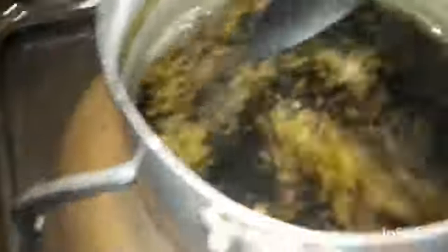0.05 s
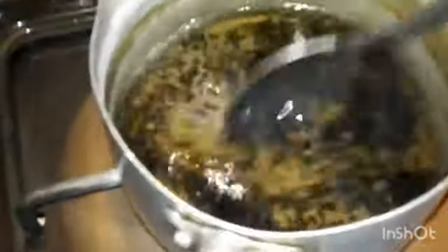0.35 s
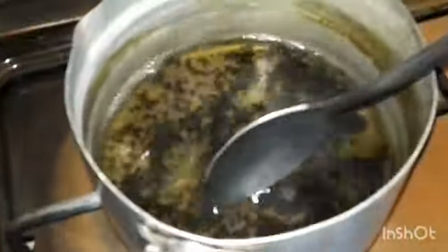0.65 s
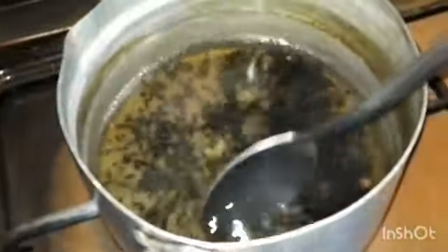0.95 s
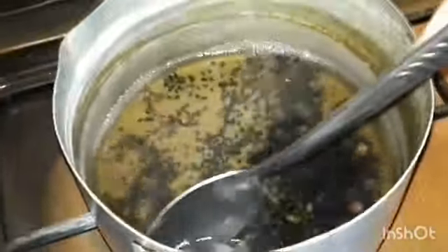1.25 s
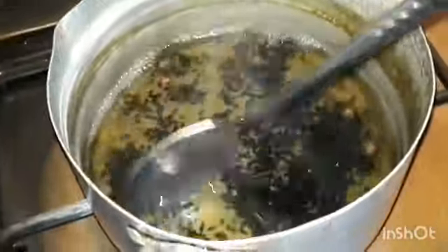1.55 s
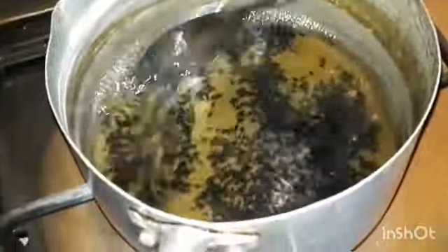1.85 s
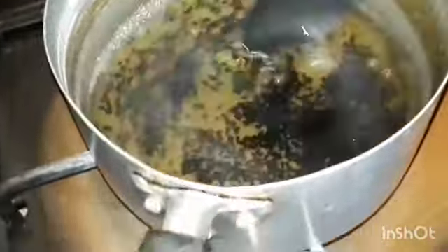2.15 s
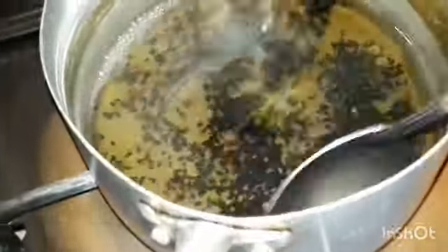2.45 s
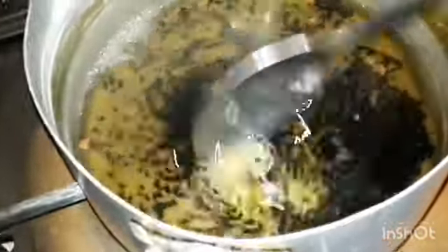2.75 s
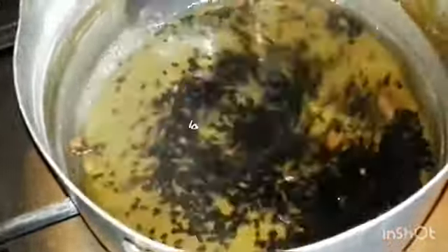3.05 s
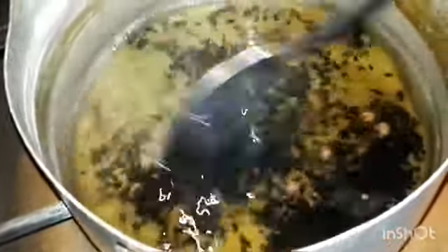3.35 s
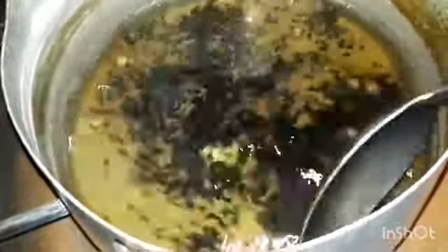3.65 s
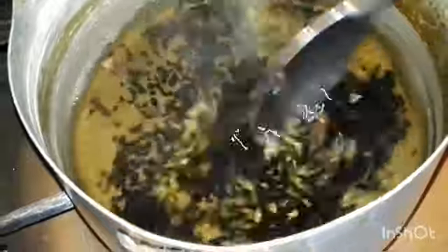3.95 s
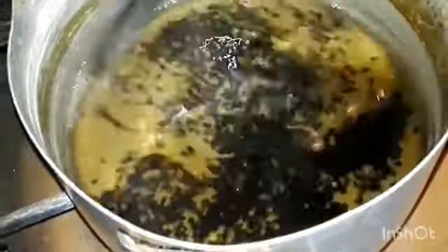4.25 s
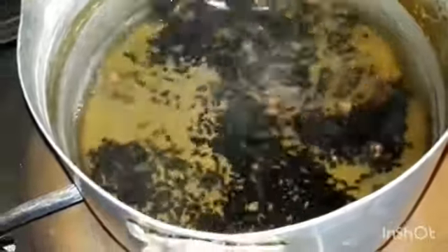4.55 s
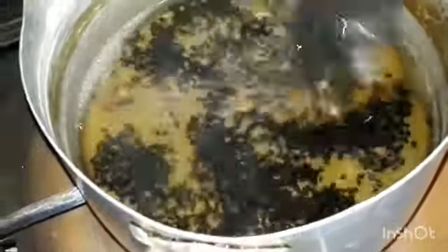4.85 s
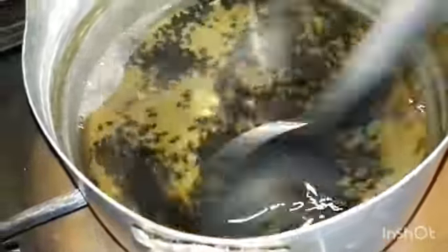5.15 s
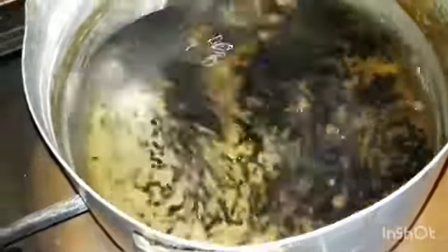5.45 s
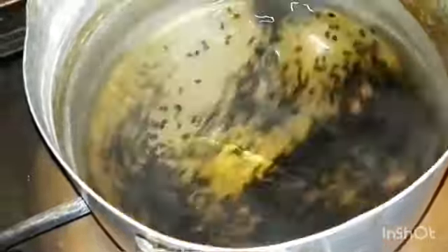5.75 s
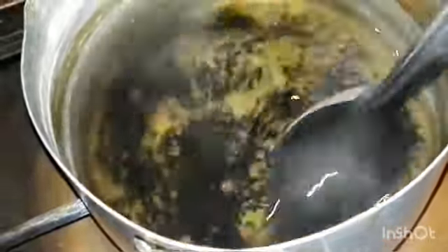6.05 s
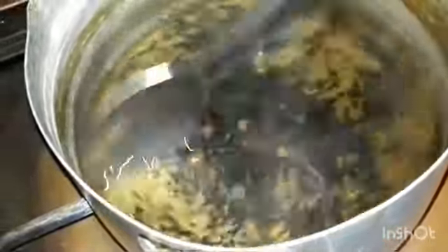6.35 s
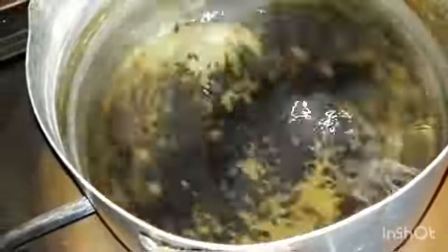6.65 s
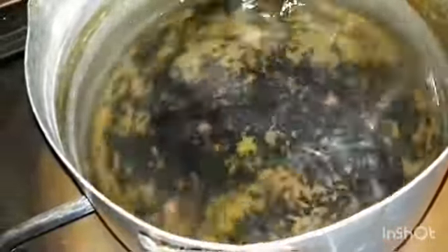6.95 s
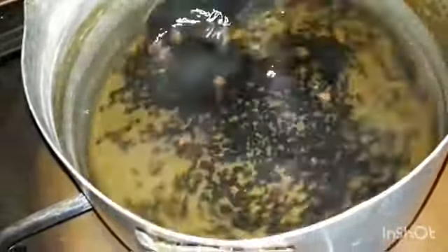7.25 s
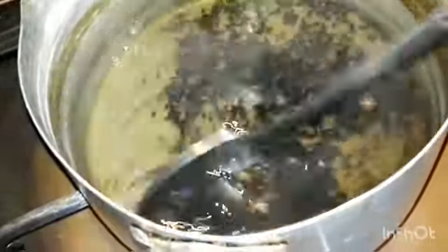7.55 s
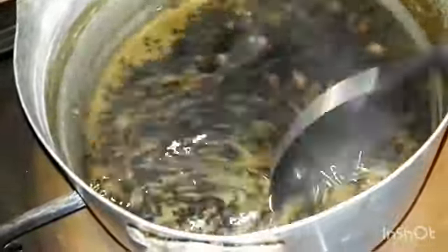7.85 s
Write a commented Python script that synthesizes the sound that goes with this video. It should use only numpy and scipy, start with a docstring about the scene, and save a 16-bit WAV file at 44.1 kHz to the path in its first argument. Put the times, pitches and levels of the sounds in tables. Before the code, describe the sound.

A metal ladle stirs tea simmering in an aluminium pot on a stove. It knocks, skids and scrapes unevenly, each blow giving a brief ring and a low boom in the small, hard kitchen. The liquid gurgles, glugs and sizzles in spurts up the hot wall. Near the end the pot rocks with a low wobble. The phone microphone is close, with some handling rumble.

```python
"""A metal ladle stirs a simmering aluminium pot of tea on a stove in a small, hard kitchen.
It knocks, skids and scrapes; the pot rings briefly and rocks near the end, and low room resonances
swell after each blow and boom on. The tea gurgles, glugs and sizzles up the hot wall.
Close pickup on a hand-held phone's two microphones, a hand's length away, with some handling rumble."""
import sys
import numpy as np
from scipy import signal
from scipy.fft import rfft, irfft
from scipy.io import wavfile
from scipy.ndimage import uniform_filter1d

SR = 44100
rng = np.random.default_rng(int(sys.argv[2]) if len(sys.argv) > 2 else 0)


def unload_wav(signal):
    """Save mono or channel-first audio to the path in sys.argv[1] as 16-bit WAV at rate SR, clipped to [-1, 1]."""
    wavfile.write(
        sys.argv[1],
        SR,
        np.round(np.clip(np.atleast_2d(signal).T, -1, 1) * 32767).astype(np.int16),
    )


N = 357651
T = np.arange(N) / SR
RING_T = T[:32768]

# the ladle drags along the pot: start/s, length/s, force/dB,
# then relative to the force: grit/dB, low boom/dB, singing wall/dB, gurgle/dB; last, singing f/Hz
STROKES = [(0.163, .16, -50, -3, 3, -3, -1, 925), (1.048, .17, -66, -19, 5.5, -0.5, 0, 936),
           (2.0, .12, -49.5, -6, -3, -4.5, 0, 962), (2.572, .1, -46, -27.5, 2, -0.5, -8, 935),
           (3.202, .12, -45.5, -12.5, -5.5, 0.5, -6, 972), (3.874, 0.097, -56.5, 5, 0, -2, 0, 940),
           (4.38, 0.21, -51.5, -15, -8.5, 0.5, -2, 970), (4.601, 0.21, -56, -3.5, 6, -14, 3, 900),
           (4.826, 0.13, -47, -2, -2, -2.5, 0, 940), (5.091, .16, -53, -13.5, -14, -11, 2.5, 844),
           (5.29, .09, -43, -1, -5.5, -6, 1, 789), (5.46, .12, -47, -19, -21, 4.5, -2, 970),
           (5.615, .2, -45.5, -21, -3.5, -10, 0, 920), (5.83, .17, -46, -6, -1.5, 3, -3.5, 949),
           (6.035, 0.18, -55.5, -21, -0.5, -7.5, 1, 950), (6.23, 0.18, -51, -3, -1, -9, 3, 874),
           (6.403, .09, -55, -10, -12, 4, -1, 950), (6.606, 0.06, -53, -23, -1, -9, 0, 1000),
           (6.871, 0.13, -67, -22.5, 4, -15, -3, 950), (7.275, 0.1, -51, -3, 2.5, -10, 3, 880),
           (7.421, 0.1, -47, -10, -28, -2, -3.5, 946), (7.785, .09, -46, -3.5, 1, 3, 2, 934),
           (7.899, .21, -48.5, -2.5, 3, -2, 1, 976)]
# spectrum of the pot's dense shell modes: f/Hz, level/dB
SHELL_SPECTRUM = [(100, -30), (400, -5), (900, 2), (1400, 1), (2000, 2), (2700, -3), (4000, 0), (5600, 1),
                  (7200, -2), (10000, -3), (14000, -2)]


def undb(db):
    """Decibels to gain."""
    return np.exp(np.asarray(db) * np.log(10) / 20)


def unit(x):
    """Scale to rms 1."""
    return x / np.sqrt(np.mean(x ** 2))


def unit_energy(x):
    """Scale a response to energy 1."""
    return x / np.sqrt(np.sum(x ** 2))


def add(out, s, x):
    """Mix x into out from time s."""
    i = max(int(s * SR), 0)
    out[i:i + len(x)] += x[:N - i]


def delayed(x, s):
    """The same sound, s seconds later."""
    return np.r_[np.zeros(int(s * SR)), x][:N]


def convolve(x, response):
    """Play x through a response."""
    return signal.oaconvolve(x, response)[:len(x)]


def colour(x, points, size=2048):
    """Minimum-phase filter through points of f/Hz, level/dB."""
    hz, db = np.transpose(points)
    bin_hz = np.arange(size // 2 + 1) * SR / size
    gain = undb(np.interp(np.log(bin_hz + 1), np.log(hz), db))
    cepstrum = irfft(np.log(gain))
    cepstrum[1:size // 2] *= 2
    cepstrum[size // 2 + 1:] = 0
    return convolve(x, irfft(np.exp(rfft(cepstrum))))


def band(x, lo_hz, hi_hz):
    """Band-pass."""
    return signal.sosfilt(signal.butter(2, [lo_hz, hi_hz], "band", fs=SR, output="sos"), x)


def resonance(x, hz, width_hz):
    """A two-pole resonance whose centre may move; noise comes out equally strong at any width."""
    turn = np.exp(2j * np.pi * np.cumsum(hz) / SR)
    pole = np.exp(-np.pi * width_hz / SR)
    baseband = signal.lfilter([(1 - pole) ** 2], [1, -2 * pole, pole * pole], x * turn.conj())
    return 2 * (turn * baseband).real * np.sqrt(2 * SR / (np.pi * width_hz))


def walk(rate_hz):
    """Smooth random wandering, rms 1."""
    hold = int(SR / rate_hz)
    steps = np.repeat(rng.standard_normal(N // hold + 1), hold)
    return unit(uniform_filter1d(steps, hold)[:N])


def clicks(per_s, spread_db):
    """Random clicks of uneven size, rms 1."""
    size = undb(spread_db * np.minimum(rng.exponential(size=N), 4))
    return unit((rng.random(N) < per_s / SR) * size * rng.choice([-1, 1], N))


def held(start, length, attack_s, release_s):
    """Gain over time: a straight attack, a hold, an exponential release."""
    attack = np.clip((T - start) / attack_s, 0, 1)
    return attack * np.exp(-np.clip((T - start - length) / release_s, 0, 20))


def fade(t60):
    """Exponential decay, 60 dB in t60 seconds."""
    return np.exp(-np.log(1000) * RING_T / t60)


def modes(table, size=len(RING_T), tuning=1):
    """One decaying sine for each row of f/Hz, level/dB, t60/s; neighbours swing in opposite sense."""
    return np.array([(-1) ** k * undb(db) * np.sin(2 * np.pi * hz * tuning * RING_T[:size])
                     * fade(t60)[:size] for k, (hz, db, t60) in enumerate(table)])


def bubbles(force, db, count, cycles, glide, lowest_hz, octaves):
    """Bubbles ring and rise in pitch; they come thicker and louder where the force is high."""
    out = np.zeros(N)
    stirring, loudness = np.cumsum(force), np.sqrt(force / force.mean())
    for when, height, weakness in rng.random((count, 3)):
        hz = lowest_hz * 2 ** (octaves * height)
        age = T[:int(2 * cycles / hz * SR)] * hz / cycles
        plop = np.sin(2 * np.pi * cycles * age * (1 + glide * age / 2)) * np.exp(-3 * age)
        i = np.searchsorted(stirring, when * stirring[-1])
        add(out, i / SR, undb(db - 10 * weakness) * loudness[i] * plop)
    return out


def simmer(murmur_db=-64, blip_db=-66):
    """The burner and the pot murmur on; lone bubbles surface."""
    # spectrum of burner and pot: f/Hz, level/dB
    spectrum = [(15, -49), (25, -46), (87, -31), (113, -2.5), (382, -6.5), (498, -34.5), (539, -12.5),
                (684, -24), (1050, -11.5), (1640, -23), (2080, -22.5), (2440, -32.5), (4500, -29.5),
                (14000, -30)]
    restless = undb(1.3 * walk(9))
    blips = bubbles(np.ones(N), blip_db, count=160, cycles=12, glide=.08, lowest_hz=230, octaves=3)
    murmur = unit(colour(rng.standard_normal(N), spectrum))
    return murmur * undb(murmur_db) * restless + blips


def handling(steady_db=-71.5):
    """Low, uneven rumble through the phone's body, stronger while the hand shifts."""
    # shifts of grip: start/s, length/s, level/dB
    grips = [(0, 1.51, -60), (7.755, 0.23, -55)]
    shifting = sum(undb(db) * held(start, length, attack_s=.0079, release_s=.03)
                   for start, length, db in grips)
    surge = undb(2 * walk(15))
    rumble = unit(band(rng.standard_normal(N), 24, 100))
    return rumble * (undb(steady_db) + shifting) * surge


def sizzle(flutter_db=3, crest_shape=2.6):
    """Countless tiny steam bubbles burst where tea meets hot metal, in spurts of changing colour."""
    # tea swells up the hot wall and falls back: crest t/s, half width/s, level/dB
    washes = [(.01, 0.019, -53), (.67, 0.25, -73.5), (1.059, 0.17, -64.5), (1.55, 0.16, -60),
              (1.831, 0.09, -52), (2.66, 0.13, -57.5), (2.891, 0.064, -47.5), (4.169, 0.14, -69.5),
              (5.35, 0.079, -47), (5.495, 0.068, -36.5)]
    # edges of the bands that spurt independently: f/Hz
    edges = [500, 3000, 4500, 6500, 9500, 16000]
    # spectrum of the bursting bubbles: f/Hz, level/dB
    spectrum = [(500, -13.5), (2000, -0.5), (3000, -1.5), (4200, 2.5), (5700, 7), (7500, 1.5), (10000, 0.5),
                (14000, -3.5)]
    wetted = sum(undb(db) * np.exp(-np.abs((T - crest) / width) ** crest_shape)
                 for crest, width, db in washes)
    hiss = sum(band(clicks(9000, 1.7), lo, hi) * undb(1.7 * walk(30))
               for lo, hi in zip(edges, edges[1:]))
    return unit(colour(hiss, spectrum)) * wetted * undb(flutter_db * walk(39.88))


def spot_weights(count):
    """Random mode gains: each contact favours some modes over others."""
    return undb(2.5 * rng.standard_normal(count))


def pot_response(shell_db, shell_t60, size=4096, contact_s=.0003):
    """Wall, rim and tick responses at one spot: clear modes over a dense, quickly dying shell."""
    # modes of pot and ladle, damped by the tea: f/Hz, level/dB, t60/s
    pot_modes = [(786, -17, 0.043), (819, -5, 0.0089), (981, -1, 0.016), (1027, -2.5, 0.011),
                 (1250, -13.5, 0.029), (1372, -10.5, 0.066), (1860, -2, 0.017), (1887, -4, 0.017),
                 (1870, 17.5, 0.00083), (3650, 18, 0.0019), (3940, -15.5, 0.087), (3860, -24.5, 0.14),
                 (5760, -2, 0.018), (8020, 3, 0.0078), (8400, -35.5, 0.025), (9420, -10, 0.028),
                 (11160, -21, 0.051)]
    tuning = 1 + .012 * rng.standard_normal()
    shell = colour(rng.standard_normal(size) * fade(shell_t60)[:size], SHELL_SPECTRUM)
    clear = spot_weights(len(pot_modes)) @ modes(pot_modes, size, tuning)
    onset = 1 - np.exp(-RING_T[:size] / contact_s)
    ring = (clear + undb(shell_db) * shell) * onset
    wall, rim, tick = band(ring, 680, 1170), band(ring, 1500, 2080), band(ring, 3300, 16000)
    return np.array([unit_energy(wall), unit_energy(rim), unit_energy(tick)])


def diffuse_tick(size=512):
    """Summed over many directions or contact points, the treble modes blur into an even tick."""
    return unit_energy(band(colour(signal.unit_impulse(size), SHELL_SPECTRUM), 2400, 18000))


def skids(wall_db=-3, rim_db=-2, grit_db=-2):
    """Pressed hard, the ladle's edge sticks and slips in a short rough rasp."""
    # the edge chatters over the metal: t/s, length/s, level/dB, rim emphasis/dB
    chatters = [(0.017, 0.072, -58, 1.5), (3.686, 0.045, -34.5, -2), (4.645, 0.04, -45.5, -18),
                (4.72, 0.037, -43, 1), (4.905, 0.078, -40, -5), (6.709, 0.011, -44, -13),
                (7.437, 0.0099, -57.5, 18)]
    out, slips = np.zeros(N), clicks(1200, 2)
    for s, length, db, emphasis in chatters:
        wall, rim, _ = pot_response(shell_db=2, shell_t60=.0064)
        burst = unit(slips[int(s * SR):][:int(length * SR)])
        force = undb(db) * burst * signal.windows.tukey(len(burst))
        add(out, s, signal.fftconvolve(force, undb(wall_db) * wall + undb(rim_db + emphasis) * rim))
        add(out, s, signal.fftconvolve(force, undb(grit_db) * diffuse_tick()))
    return out


def low_boom_response(dense_db, dense_t60=.52, swell_s=.017):
    """Low room resonances swell after a blow and boom on."""
    # low resonances of the room: f/Hz, level/dB, t60/s
    room_modes = [(153.8, -12.5, 0.83), (228.1, -3.5, 0.57), (264.5, 4.5, 0.29), (303.7, -3.5, 0.66),
                  (331, -2.5, 0.5), (375, -15, 0.67), (400, -4.5, 0.5), (435, -1.5, 0.33),
                  (466.2, 2.5, 0.35), (572.4, -2.5, 0.22)]
    clear = spot_weights(len(room_modes)) @ modes(room_modes)
    dense = band(rng.standard_normal(len(RING_T)), 178, 443) * fade(dense_t60)
    swell = 1 - np.exp(-RING_T / swell_s)
    boom = (unit_energy(clear) + undb(dense_db) * unit_energy(dense)) * swell
    return unit_energy(band(boom, 150, 2200))


def favour(response, hz, t60, db, rise_s=.00029):
    """Bring out the one mode that a blow drives best; energy 1."""
    t = RING_T[:len(response)]
    ring = modes([(hz, 0, t60)], len(t))[0] * (1 - np.exp(-t / rise_s))
    return unit_energy(response + undb(db) * unit_energy(ring))


def knocks(ring_db=25, tick_db=20, boom_db=32, snap_db=22, hard_db=-24, hardening=4.2):
    """Each blow lands on another spot: the pot's snap and ring, its room spill, the low boom."""
    # ladle blows: t/s, tick/dB, wall/dB, rim/dB, low boom/dB,
    # then the modes the blow favours: wall f/Hz, rim f/Hz, tick f/Hz, rim t60/s, boom f/Hz
    blows = [(0.1537, -34.5, -32.5, -39.5, -36.5, 850, 1760, 8540, .02, 265),
             (0.8345, -30, -27, -36.5, -31.5, 952, 1850, 3800, 0.029, 257.7),
             (0.9, -40.5, -41.5, -43.5, -41, 974, 1830, 3940, 0.018, 262),
             (1.0923, -65, -49, -79, -46.5, 860, 1850, 5060, .02, 256.5),
             (1.5522, -40.5, -43.5, -47.5, -46, 940, 1815, 6800, 0.061, 334),
             (1.978, -28.5, -33, -39, -33, 940, 1830, 3880, 0.035, 299.5),
             (2.4154, -36.5, -42.5, -40.5, -36.5, 780, 1910, 5080, 0.036, 232),
             (2.4853, -46, -42.5, -42.5, -44.5, 970, 1930, 4360, 0.017, 270),
             (3.0008, -38.5, -52.5, -49.5, -51.5, 970, 1840, 5000, 0.034, 298),
             (3.0602, -24, -24, -26.5, -30.5, 906, 1960, 6850, 0.0087, 260),
             (3.5649, -26.5, -36.5, -29, -35, 827, 2000, 4340, 0.044, 456.6),
             (3.5956, -34, -39, -33, -35, 1050, 1900, 3040, 0.053, 307),
             (3.678, -30, -37.5, -33.5, -41, 1140, 1780, 7730, 0.096, 265),
             (3.811, -31.5, -32.5, -35.5, -38, 990, 1810, 5180, 0.049, 306.5),
             (4.3562, -42.5, -65, -65, -61, 950, 1850, 4260, .02, 310),
             (4.3854, -42, -47, -51, -55, 970, 1850, 4460, 0.028, 258),
             (4.547, -56, -40.5, -53, -54, 815, 1830, 4440, 0.017, 266),
             (4.599, -29.5, -36, -41.5, -40, 890, 1860, 3580, 0.045, 461),
             (4.673, -35, -70, -61, -63, 950, 1850, 5070, .02, 304),
             (4.8097, -46.5, -37, -48, -37, 985, 1820, 5490, .02, 262.3),
             (4.9142, -26, -30, -26.5, -35, 904, 1800, 7970, 0.12, 241.7),
             (5.0556, -37, -38.5, -44, -39, 990, 1800, 4320, 0.019, 300.8),
             (5.2647, -44, -33.5, -39.5, -40, 787, 1890, 5300, 0.016, 320),
             (5.597, -35, -37, -65, -41, 1000, 1880, 4600, .02, 222),
             (5.6431, -65, -31.5, -43.5, -41, 940, 1820, 6300, 0.033, 226.7),
             (6.2245, -27.5, -32.5, -26.5, -33.5, 1140, 1886, 5150, 0.033, 326),
             (6.586, -38.5, -35.5, -45, -40.5, 1010, 1880, 3700, 0.027, 299),
             (6.6574, -43, -38, -46.5, -45, 954, 1800, 3560, .03, 220.6),
             (6.706, -31.5, -30, -28.5, -39, 940, 1830, 3690, 0.088, 233),
             (7.2256, -29.5, -29, -36.5, -35, 1020, 2010, 8300, 0.022, 236.4),
             (7.371, -51, -47, -50, -52, 1150, 2030, 3900, .02, 300),
             (7.4119, -42, -36.5, -44, -38.5, 994, 1820, 6330, .02, 459.7),
             (7.5467, -31, -31, -30, -40.5, 1230, 1850, 5050, 0.027, 258),
             (7.6981, -34, -31.5, -38, -38, 950, 1480, 5780, 0.013, 268)]
    pot, spill, low_boom = np.zeros((3, N))
    snap, blurred_tick = band(signal.unit_impulse(256), 500, 15000), diffuse_tick()
    for s, tick, wall, rim, boom, wall_hz, rim_hz, tick_hz, rim_t60, boom_hz in blows:
        gains = undb([wall + ring_db, rim + ring_db, tick + tick_db])
        responses = pot_response(shell_db=9, shell_t60=.008)
        rings = np.array([favour(responses[0], wall_hz, t60=.036, db=1),
                          favour(responses[1], rim_hz, t60=rim_t60, db=3),
                          favour(responses[2], tick_hz, t60=.041, db=-6)])
        add(pot, s, gains @ rings)
        # only hard blows bring out the snap
        add(pot, s, undb(tick + snap_db + hardening * (tick - hard_db)) * snap)
        spilled = gains * undb([-2, -5, 1])  # wall, rim and tick into the room
        add(spill, s, spilled[:2] @ responses[:2])
        add(spill, s, spilled[2] * blurred_tick)
        room_ring = favour(low_boom_response(dense_db=-4), boom_hz, t60=.4, db=-6, rise_s=.039)
        add(low_boom, s, undb(boom + boom_db) * room_ring)
    return pot, spill, low_boom


def stroke_forces(bite_s=.074, let_go_s=.0074):
    """The ladle bites, holds and lets go, driving pot, grit, low boom, singing wall and gurgle."""
    forces = np.zeros((5, N))
    for start, length, db, *shares_db, _ in STROKES:
        force = undb(db) * held(start, length, bite_s, let_go_s)
        forces += np.outer(undb([0, *shares_db]), force)
    return forces


def rubbing(wet, gritty):
    """The ladle's resonances waver and swell as it dips and turns."""
    # resonances of the rubbing ladle: f/Hz, level/dB
    ladle_modes = [(600, -4.5), (1090, -6), (1370, -4), (1840, 0.5), (3000, -18), (3900, -11.5), (5300, -7),
                   (6300, 1), (8000, 1), (10200, -0.5), (11600, -10.5)]
    out = np.zeros(N)
    for hz, db in ladle_modes:
        # wet rubbing drives the clear low ones, grit the broad high ones
        drive, width_share, drift = (wet, .06, .015) if hz < 2500 else (gritty, .24, .025)
        centre_hz = hz * np.exp(drift * walk(30))
        swell_db = 3 * walk(20)
        out += undb(db + swell_db) * resonance(drive, centre_hz, width_share * hz)
    return out


def scrapes(forces, wall_db=-14, rim_db=-15, grit_db=-6, boom_db=1.5, rub_db=-13, edge_db=-10):
    """Tiny slips of metal on metal drive pot and low boom; smooth rubbing makes a wall mode sing."""
    wall, rim, _ = pot_response(shell_db=6, shell_t60=.012)
    slips = clicks(3000, 2) * undb(2.5 * walk(55))
    grains = clicks(9000, 1.5) * undb(2.5 * walk(45))
    pressure_waver = undb(3 * walk(25))
    pot_force, grit_force, boom_force, wall_force = forces * pressure_waver
    pot_drive, grit_drive = pot_force * slips, grit_force * grains
    strokes = np.array(STROKES)
    current_stroke = np.maximum(np.searchsorted(strokes[:, 0], T) - 1, 0)
    singing_hz = strokes[current_stroke, -1] * (1 + .018 * walk(14))
    singing = resonance(wall_force * slips, singing_hz, width_hz=105)
    ring = convolve(pot_drive, undb(wall_db) * wall + undb(rim_db) * rim)
    grit = undb(grit_db) * convolve(grit_drive, diffuse_tick())
    rub = rubbing(undb(rub_db) * pot_drive, undb(edge_db) * grit_drive)
    boom = undb(boom_db) * convolve(boom_force * slips, low_boom_response(dense_db=-6))
    return singing + ring + grit + rub, boom


def gurgle(force, large_db=-51, small_db=-54):
    """The ladle folds air into the tea: large bubbles among a crowd of small ones, in uneven spurts."""
    # the tea muffles the smallest bubbles: f/Hz, level/dB
    muffling = [(1900, -0.5), (4500, -5.5)]
    spurts = force * undb(2 * walk(28))
    large = bubbles(spurts, large_db, count=350, cycles=12, glide=.09, lowest_hz=450, octaves=2)
    small = bubbles(spurts, small_db, count=3000, cycles=18, glide=.05, lowest_hz=1100, octaves=2.1)
    return large + colour(small, muffling)


def bumps(gain_db=4):
    """Soft low bumps, each one dull swing."""
    # single swings: centre t/s, f/Hz, level/dB
    swings = [(.682, 82.6, -24), (0.774, 55, -42), (0.895, 104, -36), (0.94, 115, -41), (1.232, 94, -43),
              (2.906, 102, -39.5), (2.976, 96, -44), (3.6, 86.6, -41), (4.671, 85, -43.5),
              (5.089, 101, -37), (5.96, 63.6, -45), (6.378, 84.5, -38.5), (6.622, 94, -35.5),
              (6.664, 79.5, -36)]
    out = np.zeros(N)
    for s, hz, db in swings:
        angle = 2 * np.pi * hz * (T[:int(2 * SR / hz)] - 1 / hz)
        add(out, s - 1 / hz, -undb(db + gain_db) * angle * np.exp(-angle ** 2 / 2))
    return out


def glugs(gain_db=-2):
    """Pockets of air behind the ladle ring hollow and slide in pitch as they close or open."""
    # air pockets: t/s, length/s, start f/Hz, end f/Hz, level/dB
    pockets = [(1.58, 0.21, 339, 319, -53), (3.595, 0.083, 254.6, 338, -29.5),
               (3.675, 0.085, 263, 270, -33.5), (3.59, 0.2, 132, 163, -45.5), (3.93, 0.068, 480, 396, -52),
               (4.71, 0.078, 288, 328, -42.5), (5.63, 0.11, 256, 191, -49.5), (5.71, 0.08, 287, 322, -38),
               (5.78, 0.13, 422, 461, -50), (7.95, 0.067, 275, 338, -38), (8.0, 0.088, 248, 221, -39),
               (8.01, 0.063, 430, 381, -40.5)]
    out = np.zeros(N)
    for s, length, from_hz, to_hz, db in pockets:
        age = np.linspace(0, 1, int(length * SR))
        phase = 2 * np.pi * np.cumsum(from_hz + (to_hz - from_hz) * age) / SR
        add(out, s, undb(db + gain_db) * np.sin(np.pi * age) * np.sin(phase))
    return out * undb(2 * walk(60))


def rocking(gain_db=-3):
    """The pot rocks on its support with a low, dying wobble."""
    # rocks of the pot: t/s, level/dB
    rocks = [(7.696, -31), (7.823, -29), (7.909, -31)]
    # modes of the pot on its support: f/Hz, level/dB, t60/s
    support_modes = [(63, -9, 0.82), (123.4, -8, 0.62), (156, -9.5, 0.37)]
    out, wobble = np.zeros(N), modes(support_modes).sum(0)
    for s, db in rocks:
        add(out, s, undb(db + gain_db) * wobble)
    return out


def kitchen(x, low_t60=.33, high_t60=.37, first_s=.0019):
    """Dense reflections from nearby tiles and cupboards."""
    # colour of the room: f/Hz, level/dB
    spectrum = [(100, -35.5), (260, 12.5), (500, -22), (700, 1), (1000, 3.5), (2000, 0.5), (4000, -1.5),
                (8000, -3), (14000, -10)]
    noise = rng.standard_normal(len(RING_T))
    low = band(noise, 30, 2800)
    onset = np.clip(RING_T / first_s - 1, 0, 1)
    tail = (low * fade(low_t60) + (noise - low) * fade(high_t60)) * onset
    return convolve(x, colour(unit_energy(tail), spectrum))


def scene(room_db=-.5, boom_room_db=-13, skid_room_db=-5, scrape_room_db=-2,
          pot_lag_s=.00055, low_lag_s=.00025):
    """One microphone faces the pot; the other hears it later and from the phone's shadow."""
    # response of the facing microphone: f/Hz, level/dB
    near_mic = [(200, 0), (380, .5), (620, 4), (1000, 2), (1800, 2), (2600, 2), (4000, 5), (14000, 5.5)]
    # response of the shadowed microphone: f/Hz, level/dB
    far_mic = [(200, 0), (420, -.5), (640, -6), (950, -2.5), (1400, -.5), (1850, 0), (2400, -2), (3200, -9),
               (4500, -17), (8000, -22), (14000, -24)]
    forces = stroke_forces()
    knock, spill, knock_boom = knocks()
    scrape, scrape_boom = scrapes(forces[:4])
    liquid = sizzle() + gurgle(forces[4])
    skid = skids()
    pot = knock + scrape + liquid + skid + bumps() + rocking() + handling()
    boom = knock_boom + scrape_boom
    low_sounds = boom + glugs() + simmer()
    room_send = undb(room_db) * (spill + liquid + undb(scrape_room_db) * scrape
                                 + undb(skid_room_db) * skid + undb(boom_room_db) * boom)
    far_pot = delayed(pot, pot_lag_s)
    # the main wall modes swing the whole pot and reach both microphones in step
    far_pot += band(pot - far_pot, 780, 1250)
    near = colour(pot + low_sounds + kitchen(room_send), near_mic)
    far = colour(far_pot + delayed(low_sounds, low_lag_s) + kitchen(room_send), far_mic)
    return np.array([near, far])


def record(dry, top_hz=14400):
    """The phone cuts the top treble steeply."""
    return signal.sosfilt(signal.ellip(10, .2, 70, top_hz, fs=SR, output="sos"), dry)


dry = scene()
out = record(dry)
unload_wav(out)
```